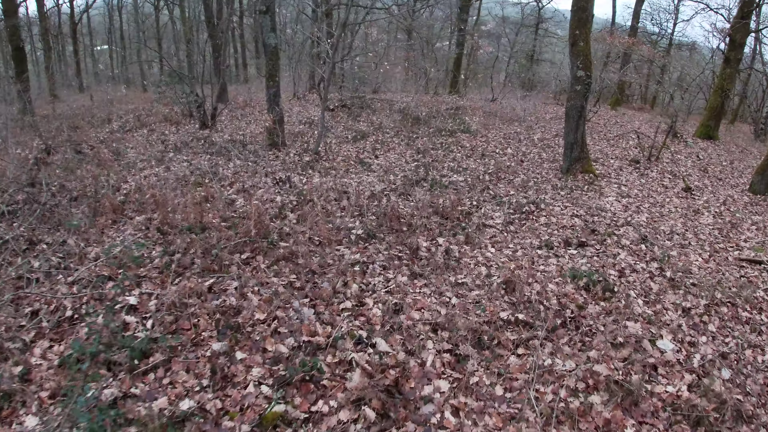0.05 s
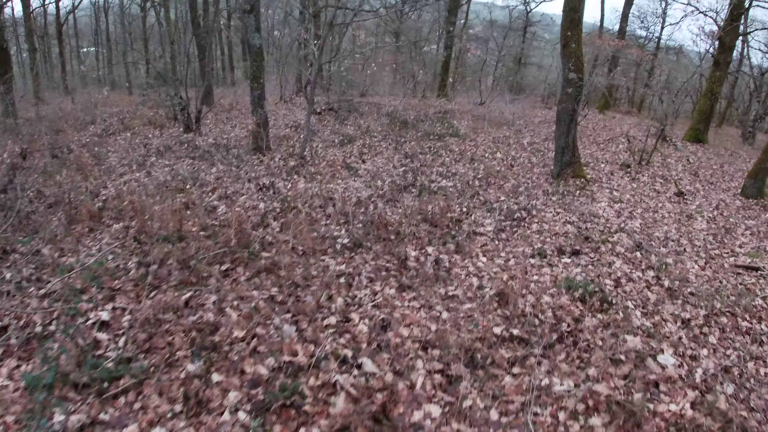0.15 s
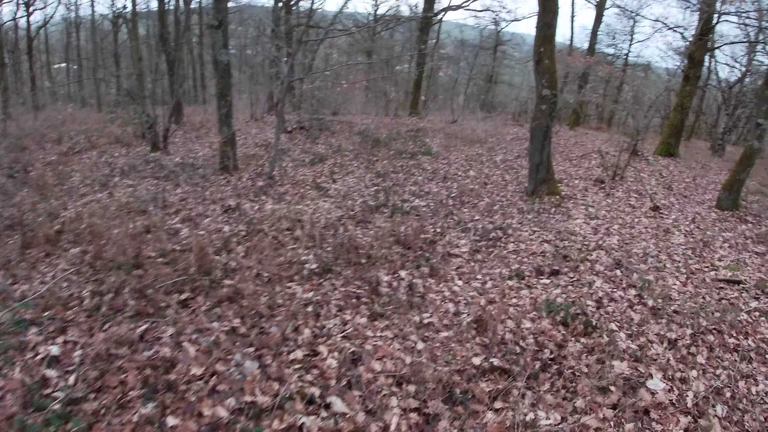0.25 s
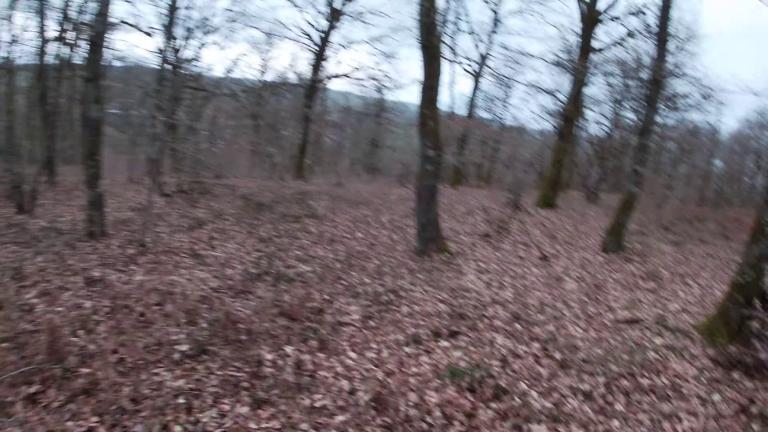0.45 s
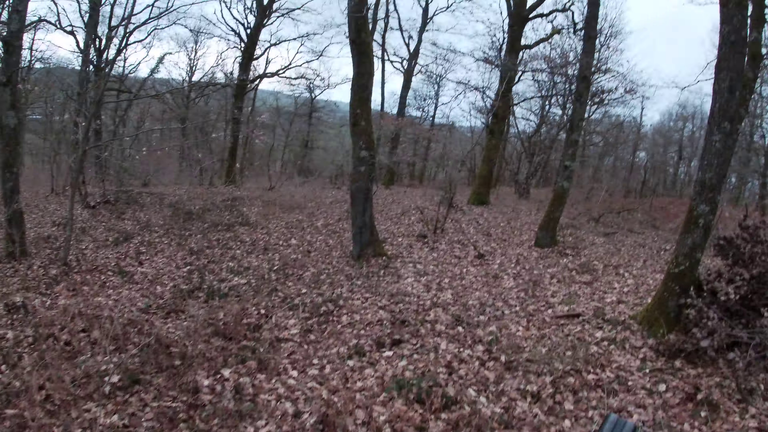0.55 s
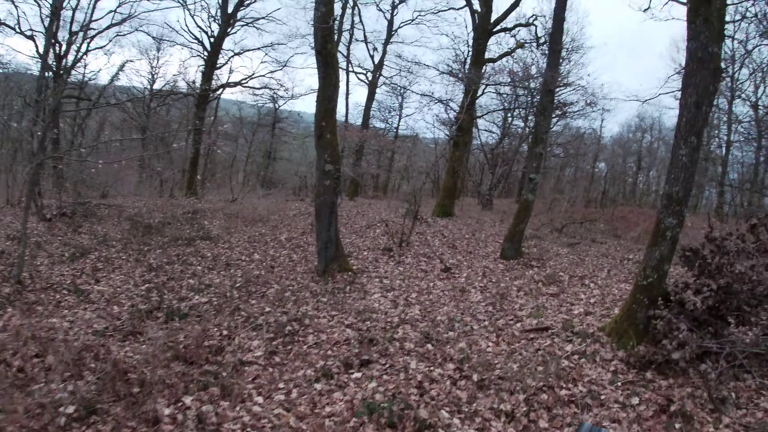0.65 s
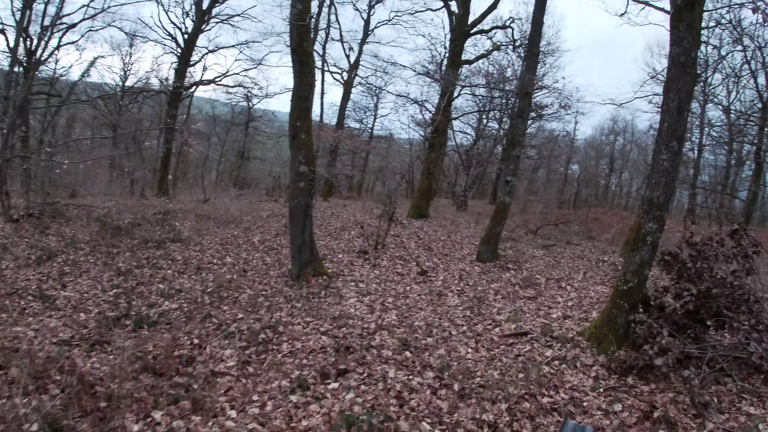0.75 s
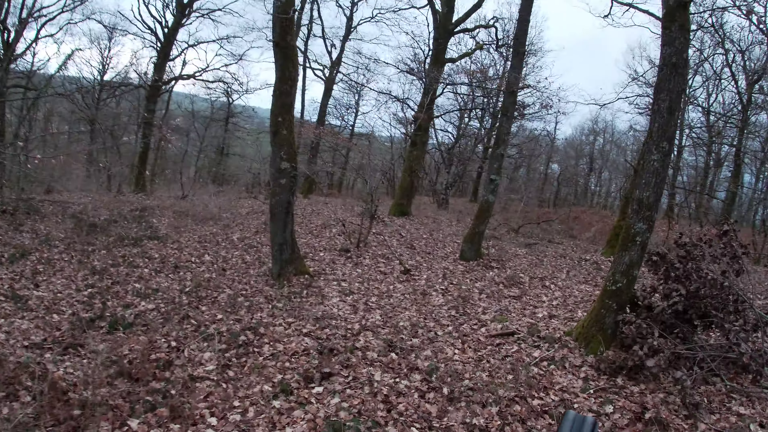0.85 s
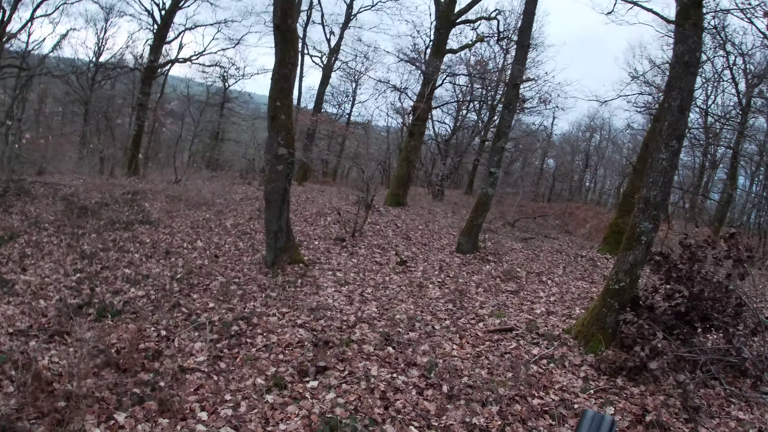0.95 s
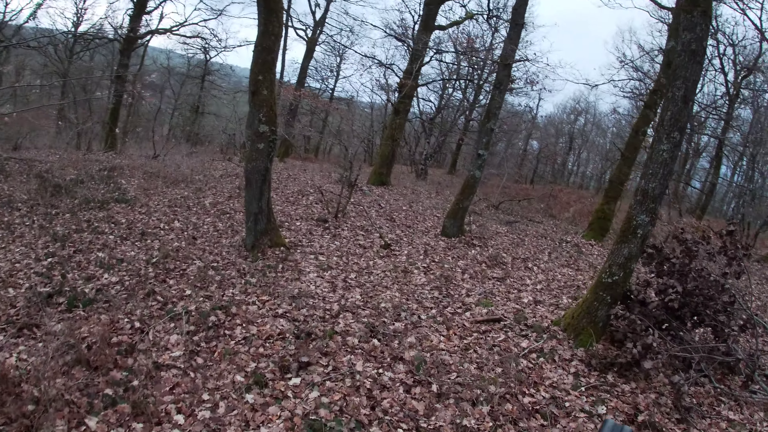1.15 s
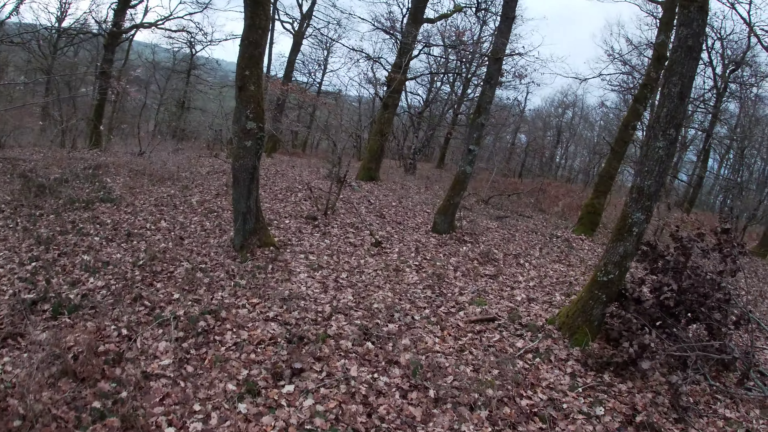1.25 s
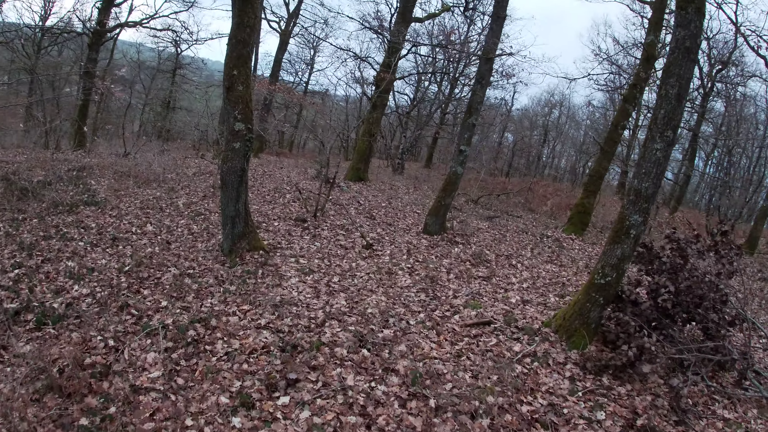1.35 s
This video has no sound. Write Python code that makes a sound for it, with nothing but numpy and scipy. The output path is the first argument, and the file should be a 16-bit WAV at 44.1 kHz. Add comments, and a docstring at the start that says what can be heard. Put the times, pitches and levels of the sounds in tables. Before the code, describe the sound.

Footsteps in dry fallen leaves: a crackling first step with a low thump and sharp snap, then a lighter one, in a quiet wood; dull knocks and rubbing close to the hand-held microphone.

```python
"""Two steps crush dry fallen leaves in a quiet wood: swelling noise and random grains make crackle and crunch.
The first lands with a low thump (sagging sine) and a sharp snap (damped modes); the second is lighter.
Dull knocks (damped modes with scuffs) and rubbing (shaped grains) sound close to a hand-held camera's
microphone, and moving air rumbles on it (low noise). A faint rustle lies beneath; the sound is mono."""
import sys
import numpy as np
from scipy import signal
from scipy.fft import rfft, irfft, next_fast_len
from scipy.io import wavfile
from scipy.ndimage import map_coordinates

SR = 44100
rng = np.random.default_rng(int(sys.argv[2]) if len(sys.argv) > 2 else 0)


def generate_wav(signal):
    """Clip the signal to [-1, 1] and save it as 16-bit WAV at the path in sys.argv[1]."""
    frames = np.transpose(np.atleast_2d(signal))
    scaled = np.clip(frames, -1, 1) * 32767
    pcm = np.round(scaled).astype(np.int16)
    wavfile.write(sys.argv[1], SR, pcm)


N = 61739

# Spectrum of cracking and splintering leaf matter. Each row: frequency in Hz, relative level in dB.
CRACK_SPECTRUM = [(300, -14), (1000, -5.5), (3200, 3), (6200, 5), (7600, -2.5), (9000, -13), (11000, -35),
                  (15500, -47)]
# Spectrum of rubbing and scuffing near the microphone. Each row: frequency in Hz, relative level in dB.
RUB_SPECTRUM = [(60, -39), (110, -10), (160, -0.5), (380, 1.5), (600, -1.5), (1100, -15), (2500, -19),
                (6000, -48)]


def amp(db):
    """Amplitude ratio of a level in dB."""
    return 10 ** (np.asarray(db) / 20)


def unit(x):
    """x scaled to rms 1."""
    return x / np.sqrt(np.mean(x ** 2) + 1e-20)


def since(start_s):
    """Seconds since start_s, zero before it."""
    return np.maximum(np.arange(N) / SR - start_s, 0)


def filtered(x, response):
    """x times a response of frequency in Hz, zero-padded against wrap-around."""
    size = next_fast_len(N + 8192)
    spectrum = rfft(x, size) * response(np.fft.rfftfreq(size, 1 / SR))
    return irfft(spectrum, size)[:N]


def coloured(x, points):
    """x through a spectrum of (Hz, dB) points joined on a log-frequency axis, at rms 1."""
    point_hz, point_db = np.transpose(points)

    def response(hz):
        return amp(np.interp(np.log(hz + 1), np.log(point_hz + 1), point_db))

    return unit(filtered(x, response))


def noise(points):
    """Steady Gaussian noise of the given spectrum, at rms 1."""
    return coloured(rng.standard_normal(N), points)


def patchy(x):
    """x with small random patches of gain in time and frequency: each leaf colours its own short stretch."""
    spread_db, patch_hz, patch_s = 1.73, 520, 0.012
    window = 256  # samples, hop is half
    bins = signal.stft(x, nperseg=window)[2]
    band, frame = np.indices(bins.shape)
    knots = rng.standard_normal((128, 512))
    row = band * SR / window / patch_hz
    column = frame * (window // 2) / SR / patch_s
    field = map_coordinates(knots, [row, column], mode="mirror")
    return signal.istft(bins * amp(spread_db * field), nperseg=window)[1][:N]


def grains(points):
    """Dense rain of tiny fractures of uneven size and colour on a bed of hiss, at rms 1."""
    grains_per_s, spread_db, hiss_db = 3000, 3, -3
    hit = rng.random(N) < grains_per_s / SR
    size = amp(spread_db * np.minimum(rng.exponential(size=N), 5))
    fractures = unit(hit * size * rng.choice([-1, 1], N))
    hiss = amp(hiss_db) * rng.standard_normal(N)
    return coloured(patchy(fractures + hiss), points)


def swells(rows):
    """Power-summed gain of events (full at s, rise s, hold s, fall s, dB) with slopes straight in dB."""
    edge_db = 23.5  # drop over one rise or fall time
    t = np.arange(N) / SR
    power = 0
    for full_s, rise_s, hold_s, fall_s, db in rows:
        distance = np.maximum(full_s - t, 0) / rise_s + since(full_s + hold_s) / fall_s
        power = power + amp(db - edge_db * distance) ** 2
    return np.sqrt(power)


def bursts(rows, t60_s):
    """Summed gain of quickly rising, exponentially dying events (s, dB, ..)."""
    attack_s = 0.00061
    gain = 0
    for start_s, db, *_ in rows:
        t = since(start_s)
        gain = gain + amp(db - 60 * t / t60_s) * (1 - np.exp(-t / attack_s))
    return gain


def ring(t, hz, t60_s, attack_s):
    """One damped mode: a sine with exponential attack and decay."""
    return np.sin(2 * np.pi * hz * t) * 1000 ** (-t / t60_s) * (1 - np.exp(-t / attack_s))


def woodland():
    """Faint rustle under everything: grains at a slowly drifting level."""
    # Floor spectrum. Each row: frequency in Hz, relative level in dB.
    floor_spectrum = [(20, 0), (40, -3), (90, -19.5), (150, -7.5), (280, -7), (480, -7), (800, -9),
                      (1500, -8.5), (2200, -15.5), (3300, -13.5), (4900, -14), (6400, -13.5), (8000, -24),
                      (10500, -36.5), (15500, -55)]
    # Floor drift. Each row: time in seconds, level in dB.
    floor_level = [(0, -49.5), (.55, -47.5), (.82, -48), (1.1, -51), (1.3, -50.5), (1.4, -55)]
    time_s, db = np.transpose(floor_level)
    return amp(np.interp(np.arange(N) / SR, time_s, db)) * grains(floor_spectrum)


def handling():
    """Rubbing and air rumble as the camera swings: swelling mid-low grains and low noise."""
    # Soft rubs. Each row: full at in seconds, rise, hold and fall in seconds, level in dB.
    rub_events = [(.12, 0.067, 0.063, .1, -52.5), (.243, .02, 0.01, 0.063, -41.5),
                  (.595, 0.066, 0.018, 0.03, -46), (.68, 0.043, 0.11, 0.052, -47),
                  (1.10, 0.055, 0.022, 0.12, -50.5), (1.195, 0.11, .025, 0.057, -47.5)]
    # Air over the microphone. Each row: full at in seconds, rise, hold and fall in seconds, level in dB.
    gusts = [(.125, .03, 0.013, .04, -51), (.325, 0.071, 0.0086, .05, -34.5),
             (.40, 0.058, 0.046, 0.089, -36.5), (.5, .04, 0.12, 0.073, -49), (.9, 0.18, .1, .05, -56),
             (1.03, 0.036, 0.043, 0.056, -46.5)]
    # Rumble spectrum. Each row: frequency in Hz, relative level in dB.
    rumble_spectrum = [(12, -20), (25, -4), (45, -2.5), (62, -2.5), (85, -17.5), (110, -27.5), (170, -16.5),
                       (260, -36), (500, -66)]
    return swells(rub_events) * grains(RUB_SPECTRUM) + swells(gusts) * noise(rumble_spectrum)


def knocks():
    """Dull close knocks: heavily damped modes with the deep bass cut, each with a brief noise scuff."""
    # Knocks. Each row: start in seconds, level in dB, reference pitch in Hz.
    knock_events = [(0.065, -29, 397), (0.2447, -13, 177), (.577, -24, 400), (0.594, -26, 200),
                    (0.7405, -21, 330), (0.7534, -4.5, 367), (.816, -42, 600), (0.829, -32.5, 378),
                    (.991, -27, 480), (1.217, -26, 620), (1.3452, -25.5, 374)]
    # Modes of a knock. Each row: ratio to the pitch, relative level in dB, T60 in seconds, attack in seconds.
    knock_modes = [(.95, 4, 0.013, .003), (1.4, -3, 0.0087, 0.0023), (3.4, -13, 0.0066, .0003),
                   (10, -27, 0.0072, .0004)]
    low_cut_hz, scuff_db, scuff_t60_s = 125, -23.5, 0.055  # scuff level is relative to its knock
    body = np.zeros(N)
    for start_s, db, hz in knock_events:
        for k, (ratio, mode_db, t60_s, attack_s) in enumerate(knock_modes):
            sign = (-1) ** k
            body += sign * amp(db + mode_db) * ring(since(start_s), hz * ratio, t60_s, attack_s)
    high_pass = signal.butter(2, low_cut_hz, "high", fs=SR, output="sos")
    scuff = amp(scuff_db) * bursts(knock_events, scuff_t60_s) * noise(RUB_SPECTRUM)
    return signal.sosfilt(high_pass, body) + scuff


def thump():
    """The weight lands: a low sine swells, sags in pitch and dies."""
    start_s, rise_s, hold_s, t60_s = 0.2595, 0.013, 0.024, 0.15
    start_hz, sag_hz_per_s, level_db = 70.3, 30, -23.5
    t = since(start_s)
    rise = np.minimum(t / rise_s, 1)
    decay = amp(level_db - 60 * since(start_s + rise_s + hold_s) / t60_s)
    cycles = (start_hz - sag_hz_per_s * t / 2) * t  # integral of the falling pitch
    return rise * decay * np.sin(2 * np.pi * cycles)


def snap():
    """Something small and stiff snaps in two stages that ring the same short modes, then splinters."""
    # Break stages. Each row: start in seconds, level in dB.
    stages = [(0.2667, -7), (0.2697, -20.5)]
    # Modes of the snapping piece. Each row: frequency in Hz, relative level in dB, T60 in seconds.
    snap_modes = [(822, -17.5, 0.021), (1150, -14, 0.017), (1920, -20.5, 0.023), (3000, -5.5, 0.0083),
                  (3460, -3, 0.0086), (4480, -24, 0.0097), (5280, 4.5, 0.0053), (5660, -4, 0.0084),
                  (6800, -8, 0.0091), (7540, -13, 0.013)]
    attack_s, splinter_db, splinter_t60_s = 0.00025, -25, 0.034
    modes = np.zeros(N)
    for start_s, db in stages:
        for hz, mode_db, t60_s in snap_modes:
            modes += amp(db + mode_db) * ring(since(start_s), hz, t60_s, attack_s)
    splinters = bursts([(stages[0][0], splinter_db)], splinter_t60_s) * noise(CRACK_SPECTRUM)
    return modes + splinters


def leaves():
    """Bright crackle of the top leaves, a duller crunch beneath, single cracks and light swishes."""
    # Leaves pressed or brushed by a foot. Each row: full at in seconds, rise, hold and fall in seconds,
    # crackle level in dB, crunch level in dB over the crackle.
    rustles = [(0.176, 0.067, 0.013, .075, -41.5, -18), (0.256, 0.047, 0.025, 0.091, -35, -14),
               (0.349, 0.14, 0.024, 0.042, -35, -9.5), (0.389, 0.036, 0.021, .03, -31.5, -2.5),
               (0.412, 0.022, 0.039, 0.066, -31, -7), (.70, 0.054, 0.012, 0.092, -55, -1.5),
               (0.875, 0.047, 0.06, 0.15, -40, -4.5), (1.181, 0.13, 0.037, 0.092, -53, 5),
               (1.246, 0.021, 0.0064, 0.036, -43, -7)]
    # Crackle and crunch spectra. Each row: frequency in Hz, relative level in dB.
    crackle_spectrum = [(880, -44), (1500, -15.5), (2750, -5), (3440, -1), (4710, -4), (6130, -1),
                        (7450, -4.5), (8620, -16.5), (10200, -20), (11200, -31.5), (15500, -34)]
    crunch_spectrum = [(90, -17), (170, -0.5), (450, 1), (900, 2), (1400, 0), (2200, -11), (4000, -46)]
    # Single leaves cracking. Each row: start in seconds, level in dB.
    crack_events = [(.079, -38.5), (.2115, -38), (.231, -27), (.347, -25), (.376, -23), (.393, -26.5),
                    (.44, -24), (.462, -33), (.884, -30), (.91, -30.5), (.929, -29), (.968, -33),
                    (.991, -33), (1.019, -40.5), (1.102, -40)]
    # Leaves barely grazed. Each row: full at in seconds, rise, hold and fall in seconds, level in dB.
    swish_events = [(.17, 0.027, 0.022, 0.023, -46), (.2315, 0.0028, 0.0024, 0.0074, -39),
                    (.35, 0.024, 0.0052, 0.036, -39), (.562, .006, 0.0027, 0.01, -47.5),
                    (.68, 0.014, 0.038, 0.065, -51)]
    # Thin, bright swish spectrum. Each row: frequency in Hz, relative level in dB.
    swish_spectrum = [(2000, -27), (4500, -10), (6300, 2), (8000, -9), (11000, -20.5), (15500, -27)]
    crack_t60_s = 0.016
    crackle_rows = [row[:5] for row in rustles]
    crunch_rows = [(*row[:4], row[4] + row[5]) for row in rustles]
    crackle = swells(crackle_rows) * grains(crackle_spectrum)
    crunch = swells(crunch_rows) * grains(crunch_spectrum)
    cracks = bursts(crack_events, crack_t60_s) * noise(CRACK_SPECTRUM)
    swishes = swells(swish_events) * grains(swish_spectrum)
    return crackle + crunch + cracks + swishes


def scene():
    """Sum of all layers, the same in both channels."""
    mono = woodland() + handling() + knocks() + thump() + snap() + leaves()
    return np.array([mono, mono])


def record(dry):
    """The camera keeps nothing above its band limit."""
    top_hz = 15800
    return np.array([filtered(x, lambda hz: hz < top_hz) for x in dry])


dry = scene()
out = record(dry)
generate_wav(out)
```